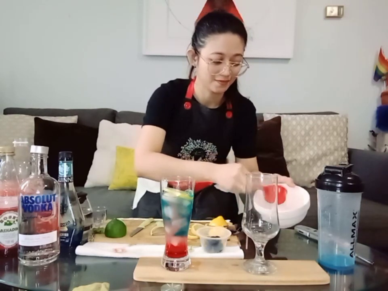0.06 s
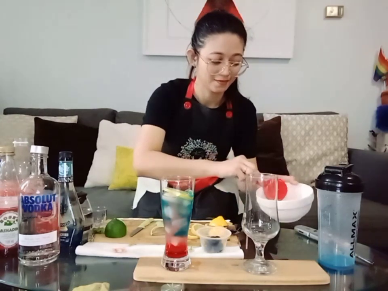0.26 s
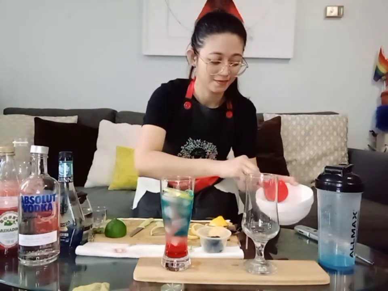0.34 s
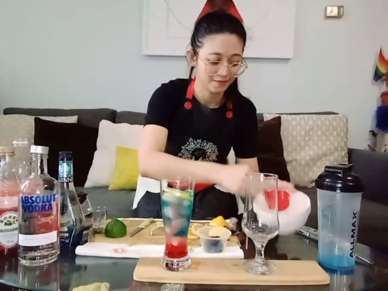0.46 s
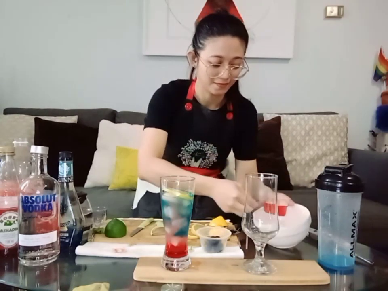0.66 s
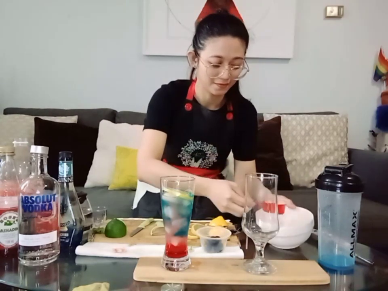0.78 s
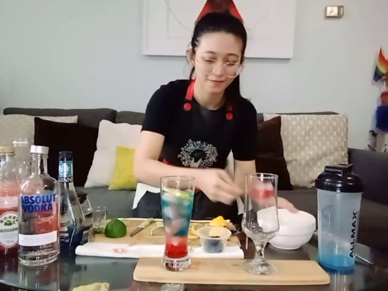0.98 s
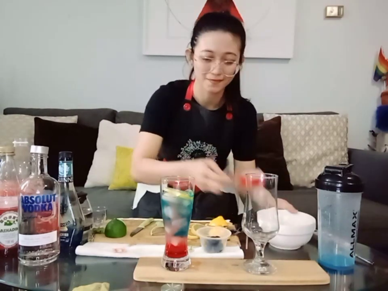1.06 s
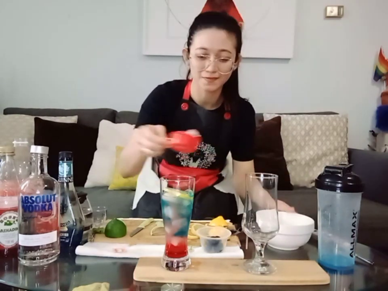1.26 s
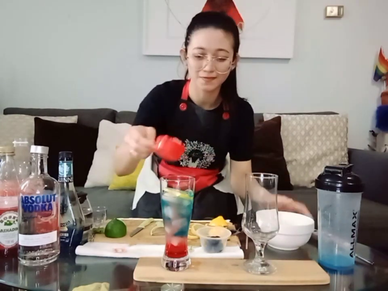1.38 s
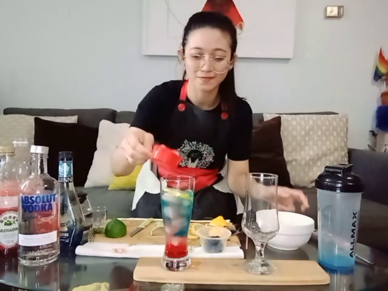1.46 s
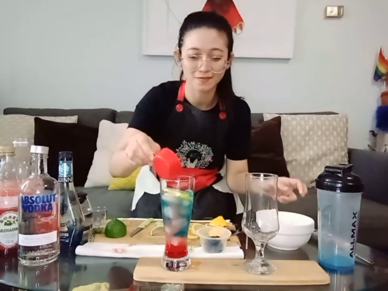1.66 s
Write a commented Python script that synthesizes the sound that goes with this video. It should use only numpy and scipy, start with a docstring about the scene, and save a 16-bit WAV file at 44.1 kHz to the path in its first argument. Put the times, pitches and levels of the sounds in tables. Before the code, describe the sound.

Ice is scooped from a bowl and tumbles into a glass, then the scoop knocks the rim

```python
"""A plastic scoop stirs and digs through ice cubes in a ceramic bowl, in a fairly live room.
Dense tiny slips sound the ice, the hollow scoop and the bowl. Cubes tumble into a tall glass: chattering
contacts excite its thud and ring. The scoop knocks the rim as it is lifted away, and its ice slides and ticks.
Low room noise and a faint hum lie underneath; one narrow-band microphone feeds both channels."""
import sys
import numpy as np
from scipy import signal
from scipy.fft import rfft, irfft
from scipy.io import wavfile
from scipy.ndimage import uniform_filter1d

SR = 44100
rng = np.random.default_rng(int(sys.argv[2]) if len(sys.argv) > 2 else 0)


def wav_record(signal):
    """Record a signal, one row per channel, as 16-bit PCM in the file named by sys.argv[1]."""
    frames = np.transpose(np.atleast_2d(signal))
    bounded = np.clip(frames, -1, 1)
    # unit amplitude maps onto the largest positive 16-bit level
    quanta = np.round(bounded * 32767).astype(np.int16)
    wavfile.write(sys.argv[1], SR, quanta)


N = 77175
T = np.arange(N) / SR  # [s]

# background noise colour: (frequency [Hz], level [dB per Hz])
FLOOR_COLOUR = [(20, -3.5), (60, -9.5), (150, -7.5), (260, -1.5), (400, -7), (520, -23.5), (1000, -20.5),
                (3000, -38.5), (8000, -43)]
FLOOR_DB, HUM_HZ, HUM_DB = -65.5, 362.5, -67

# room reverberation: (frequency [Hz], time to fall 60 dB [s])
ROOM_T60 = [(100, 0.57), (500, 0.39), (1500, 0.31), (3000, 0.4), (5000, 0.34), (8000, 0.25)]
EARLY_DB, EARLY_S, ROOM_ONSET_S = -3, 0.02, 0.0038
# tail levels; the light sounds are ticks and ice sliding in the lifted scoop
ROOM_DB, LIGHT_ROOM_DB, BUMP_ROOM_DB = -5, -14, -7.5
EVEN_OVER_HZ = 40  # width over which the room's colour is evened out

# ice slides in the scoop: (time at full force [s], rise [s], hold [s], level [dB])
SLIDES = [(1.437, 0.022, 0.011, -32.5), (1.455, 0.016, 0.018, -34), (1.52, .03, 0.019, -43)]
# colour of the sliding ice: (frequency [Hz], level [dB per Hz])
SLIDE_COLOUR = [(300, -35.5), (700, -19.5), (1500, -10.5), (2350, 2.5), (3300, -0.5), (4300, -4),
                (5700, -5), (6800, 2.5), (7600, 1.5), (8600, -15.5)]
# sharp ticks of cube on cube: (time [s], level [dB])
TICKS = [(0.1495, -46), (0.1695, -28.5), (0.2075, -31.5), (0.2225, -29), (0.4645, -28), (0.532, -25),
         (0.787, -23), (0.948, -31.5), (1.0235, -30.5), (1.031, -32.5), (1.453, -27.5), (1.5315, -30)]
TICK_DECAY_S = 0.002

# the scoop bumps the rim as it leaves: (time [s], level [dB])
BUMPS = [(1.2815, -32.5), (1.288, -17), (1.305, -24.5)]
# colour of the scoop's bump: (frequency [Hz], level [dB per Hz])
BUMP_COLOUR = [(30, -47), (70, -13), (140, -8.5), (240, -9), (470, -2), (600, -8.5), (715, 5.5), (850, -9),
               (1050, 3.5), (1500, 1), (2400, -5.5), (3400, -13.5), (5500, -25), (8000, -32.5)]
BUMP_DECAY_S, BUMP_RING_DB = 0.0047, -14.5

# cubes land in the glass and settle: (time [s], thud level [dB], bright crack level [dB])
KNOCKS = [(0.755, -32.5, -35.5), (0.7745, -13, -24.5), (0.785, -23, -30), (0.799, -32.5, -27.5),
          (0.8434, -35.5, -37.5), (0.8532, -16, -30.5), (0.858, -21, -28.5), (0.866, -28.5, -27.5),
          (0.93, -34, -42), (0.984, -31.5, -41.5), (0.994, -37.5, -77), (1.03, -33.5, -61.5),
          (1.061, -38.5, -52), (1.132, -49, -66)]
# colour of the thud: (frequency [Hz], level [dB per Hz])
THUD_COLOUR = [(30, -19.5), (70, -11), (150, -9.5), (220, 2), (310, -10.5), (420, 1), (560, -5.5), (900, 4),
               (1500, -1.5), (2200, -3.5), (3000, -11.5), (5000, -16.5), (8000, -64)]
# ringing modes of the glass: (frequency [Hz], level [dB])
GLASS_MODES = [(204, -10.5), (472, 5), (593, -1.5), (710, 3.5), (815, -1.5), (893, 5), (985, -0.5),
               (1072, 9.5), (1148, -13.5), (1372, -13.5), (1412, 2), (1640, -11), (1856, -4.5), (2016, 7)]
# glass, board and table ring on dully after a landing: (frequency [Hz], level [dB per Hz])
AFTERRING_COLOUR = [(100, -12.5), (220, 2), (320, 1.5), (550, -12), (800, -3), (1400, 2.5), (2700, -8.5),
                    (3800, -23), (8000, -34.5)]
THUD_DECAY_S, CRACK_DECAY_S = 0.0081, 0.012  # chatter at each contact
GLASS_RING_DB, GLASS_T60_S = -16, 0.18
AFTERRING_DB, AFTERRING_T60_S = -12, 1
SWELL_DB, SWELL_S = -6.5, 0.023  # a soft noisy swell just before each blow
IMPACT_DB = -8  # energy of a contact's first click, relative to its chatter

# the bowl is set ringing: (time [s], level [dB], tilt [dB per octave])
CLINKS = [(0.0005, -46, -3), (0.169, -54.5, -1), (0.207, -40.5, 11)]
# ringing modes of the bowl: (frequency [Hz], level [dB], time to fall 60 dB [s])
BOWL_MODES = [(1985, -7, .22), (2030, -9, .2), (3515, 0, .17), (5265, -3, .12), (5385, -2, .16)]
CLINK_PIVOT_HZ = 3500  # the tilt leaves this frequency unchanged

# ice rubs on ice and scoop:
# (time at full force [s], rise [s], hold [s], crunch [dB], scoop hollow [dB], bowl [dB])
STROKES = [(0.002, .01, 0.023, -49.5, -61.5, -80), (0.166, .02, .012, -46.5, -44, -72),
           (0.229, .04, 0.021, -35, -38, -79), (0.275, 0.024, 0.02, -42, -41.5, -70),
           (0.353, .02, 0.0073, -45.5, -48, -68.5), (0.438, .007, .008, -37.5, -34.5, -66),
           (0.459, .022, .012, -21, -38, -48.5), (0.48, .02, 0.039, -32.5, -31, -47.5),
           (0.53, 0.0012, 0.014, -24, -39.5, -34.5), (0.577, 0.061, 0.027, -30.5, -30.5, -43.5),
           (0.607, 0.036, 0.0027, -45.5, -27.5, -47), (0.644, 0.027, 0.01, -33.5, -34.5, -70.5)]
STROKE_RISE_DB, RELEASE_DB_PER_S = 34.5, 700.5  # climb over one rise time; fall after the hold
GRAINS_PER_S, GRAIN_SPREAD_DB = 3100, 3
# colour of crunching ice: (frequency [Hz], level [dB per Hz])
CRUNCH_COLOUR = [(300, -28.5), (620, -26.5), (780, -5.5), (1100, -5), (1500, -3.5), (2500, -1), (3500, -1),
                 (4600, -2), (5500, -0.5), (6900, 0.5), (7600, 1.5), (8600, -15.5)]
# high ring of the cubes: (frequency [Hz], level [dB])
ICE_MODES = [(3580, -5), (4272, -2), (5046, -2), (5288, 1), (6010, -3), (6473, 1), (6783, 2)]
ICE_RING_DB, ICE_T60_S = -14.5, 0.15
# hollow of the scoop: (frequency [Hz], level [dB])
SCOOP_MODES = [(1480, -4), (1700, -2), (1850, 1.5), (2020, -0.5), (2330, -8.5), (3130, -6), (3450, -7.5)]
SCOOP_T60_S = 0.038
# damped body of the bowl: (frequency [Hz], level [dB per Hz])
BOWL_COLOUR = [(50, -54), (120, -14), (190, -1), (300, -0.5), (440, 6.5), (560, 0), (850, -11), (1300, 11),
               (2500, -21.5)]

TREBLE_EDGE_HZ, CUTOFF_HZ = 6950, 8576  # microphone channel: roll-off, then cut


def from_db(db):
    """Decibels to amplitude gain."""
    return 10 ** (np.asarray(db) / 20)


def unit(x):
    """Scale to an energy of one."""
    return x / np.sqrt(np.sum(x ** 2) + 1e-20)


def at_hz(points, hz):
    """Read a table on a log-frequency axis."""
    f, v = np.transpose(points)
    return np.interp(np.log(np.maximum(hz, 1)), np.log(f), v)


def decay(t60, age=T):
    """Exponential fall of 60 dB in t60 seconds."""
    return np.exp(-np.log(1000) * age / t60)


def through(x, response):
    """Play x through an impulse response."""
    return signal.fftconvolve(x, response)[:N]


def causal(gain):
    """Minimum-phase response: the quickest-dying one with these gains per frequency."""
    cepstrum = irfft(np.log(gain + 1e-9))
    half = len(cepstrum) // 2
    # fold the backward half of the cepstrum onto the forward half
    cepstrum[1:half] *= 2
    cepstrum[half + 1:] = 0
    return irfft(np.exp(rfft(cepstrum)))


def body(colour, size=4096):
    """Heavily damped response with the given colour."""
    hz = np.arange(size // 2 + 1) * SR / size
    return unit(causal(from_db(at_hz(colour, hz))))


def ringing(modes, t60):
    """Response of decaying modes of alternating sign, with the bass below them removed."""
    rings = np.zeros(N)
    for k, (hz, db) in enumerate(modes):
        rings += (-1) ** k * from_db(db) * np.cos(2 * np.pi * hz * T)
    no_bass = signal.butter(4, modes[0][0] / 2, "high", fs=SR, output="sos")
    return unit(signal.sosfilt(no_bass, rings * decay(t60)))


def grains():
    """Rubbing as dense tiny slips of uneven size and random sign; rms 1."""
    size_db = GRAIN_SPREAD_DB * np.minimum(rng.exponential(1, N), 4)
    sizes = from_db(size_db) * rng.choice([-1, 1], N)
    slips = rng.random(N) < GRAINS_PER_S / SR
    return unit(sizes * slips) * np.sqrt(N)


def rub(rows):
    """Grains under strokes that rise, hold and die away, their powers adding."""
    power = np.zeros(N)
    for s, rise, hold, db in rows:
        below_db = STROKE_RISE_DB * np.maximum(s - T, 0) / rise
        release_db = RELEASE_DB_PER_S * np.maximum(T - s - hold, 0)
        power += from_db(db - below_db - release_db) ** 2
    return grains() * np.sqrt(power)


def contacts(rows, decay_s, swell=0):
    """Each contact is a click and a brief dying chatter, with an optional soft noisy swell before it."""
    force = np.zeros(N)
    for s, db in rows:
        lead_in = swell * np.clip(1 + (T - s) / SWELL_S, 0, 1) ** 2
        swell_and_fall = np.where(T >= s, np.exp(-np.abs(T - s) / decay_s), lead_in)
        force += from_db(db) * swell_and_fall * rng.choice([-1, 1], N)
        force[int(s * SR)] += from_db(db + IMPACT_DB) * np.sqrt(decay_s * SR / 2)
    return force


def ice(force):
    """The bright crunch of cubes: a damped body plus their short high ring."""
    crunch = through(force, body(CRUNCH_COLOUR))
    ring = through(force, ringing(ICE_MODES, ICE_T60_S))
    return crunch + from_db(ICE_RING_DB) * ring


def background():
    """Low room noise, shaped from white noise, and a faint steady hum."""
    noise = through(rng.standard_normal(N), body(FLOOR_COLOUR))
    hum = np.sin(2 * np.pi * HUM_HZ * T)
    return from_db(FLOOR_DB) * noise + from_db(HUM_DB) * hum


def room(x, tail_db, size=131072):
    """Direct sound, quick reflections off the table and a diffuse tail, even in colour overall."""
    edges = np.geomspace(40, 12000, 11)
    tail = np.zeros(N)
    for low, high in zip(edges, edges[1:]):
        band_filter = signal.butter(2, [low, high], "band", fs=SR, output="sos")
        band = signal.sosfilt(band_filter, rng.standard_normal(N))
        tail += band * decay(at_hz(ROOM_T60, np.sqrt(low * high)))
    onset = 1 - np.exp(-(T / ROOM_ONSET_S) ** 2)
    early = rng.standard_normal(N) * np.exp(-T / EARLY_S)
    response = from_db(tail_db) * unit(tail * onset) / np.sqrt(2)
    response += from_db(EARLY_DB) * unit(early * onset)
    response[0] += 1  # direct sound
    power = np.abs(rfft(response, size)) ** 2
    power = uniform_filter1d(power, int(EVEN_OVER_HZ * size / SR))
    evening = causal(np.sqrt(power.mean() / power))
    return through(through(x, response), evening)


def slides_and_ticks():
    """Ice slides in the lifted scoop as rubbing grains; cubes tick on cubes as short contacts."""
    slides = through(rub(SLIDES), body(SLIDE_COLOUR))
    return slides + ice(contacts(TICKS, TICK_DECAY_S))


def bumps():
    """Plastic on the rim: a duller knock exciting the same glass modes."""
    force = contacts(BUMPS, BUMP_DECAY_S, from_db(SWELL_DB))
    ring = through(force, ringing(GLASS_MODES, GLASS_T60_S))
    return through(force, body(BUMP_COLOUR)) + from_db(BUMP_RING_DB) * ring


def knocks():
    """Cubes land: a hollow thud, the ring of the glass and what it stands on, a crack of ice."""
    s, thud_db, crack_db = np.transpose(KNOCKS)
    dying_noise = rng.standard_normal(N) * decay(AFTERRING_T60_S)
    afterring = unit(through(dying_noise, body(AFTERRING_COLOUR)))
    rings = from_db(GLASS_RING_DB) * ringing(GLASS_MODES, GLASS_T60_S)
    rings += from_db(AFTERRING_DB) * afterring
    force = contacts(zip(s, thud_db), THUD_DECAY_S, from_db(SWELL_DB))
    thud = through(force, body(THUD_COLOUR))
    crack = ice(contacts(zip(s, crack_db), CRACK_DECAY_S, from_db(SWELL_DB)))
    return thud + through(force, rings) + crack


def clinks():
    """Touches leave the bowl's modes ringing, each with its own tilt between low and high modes."""
    out = np.zeros(N)
    for s, db, tilt_db in CLINKS:
        age = np.maximum(T - s, 0)  # the sine is silent until the touch
        for hz, mode_db, t60 in BOWL_MODES:
            gain = from_db(db + mode_db + tilt_db * np.log2(hz / CLINK_PIVOT_HZ))
            out += gain * np.sin(2 * np.pi * hz * age) * decay(t60, age)
    return out


def digging():
    """Each stroke crunches the ice and sounds the hollow of the scoop and the bowl."""
    s, rise, hold, crunch_db, scoop_db, bowl_db = np.transpose(STROKES)
    crunch = ice(rub(zip(s, rise, hold, crunch_db)))
    scoop = through(rub(zip(s, rise, hold, scoop_db)), ringing(SCOOP_MODES, SCOOP_T60_S))
    bowl = through(rub(zip(s, rise, hold, bowl_db)), body(BOWL_COLOUR))
    return crunch + scoop + bowl


def scene():
    """All sources in the room, the same in both channels."""
    light = slides_and_ticks()
    mono = room(digging() + clinks() + knocks(), ROOM_DB)
    mono += room(light, LIGHT_ROOM_DB)
    mono += room(bumps(), BUMP_ROOM_DB)
    mono += background()
    return np.stack([mono, mono])


def record(dry):
    """A narrow-band microphone channel: the treble rolls off, then is cut."""
    roll_off = signal.butter(12, TREBLE_EDGE_HZ, fs=SR, output="sos")
    cut = signal.ellip(10, 0.5, 60, CUTOFF_HZ - 100, fs=SR, output="sos")
    return signal.sosfilt(cut, signal.sosfilt(roll_off, dry))


dry = scene()
out = record(dry)
wav_record(out)
```